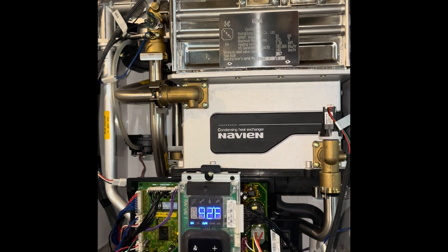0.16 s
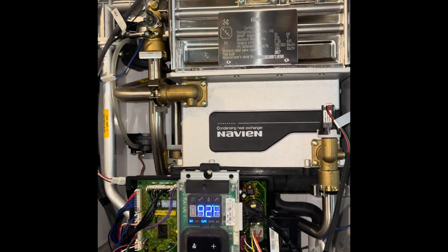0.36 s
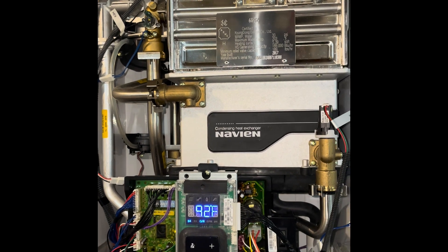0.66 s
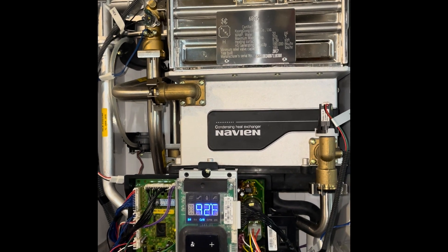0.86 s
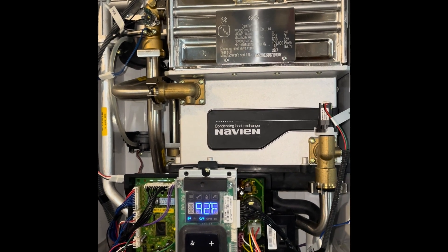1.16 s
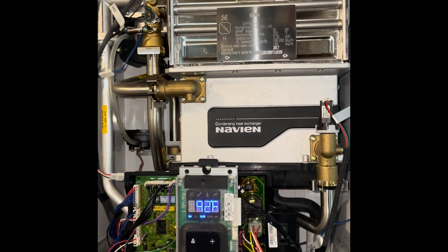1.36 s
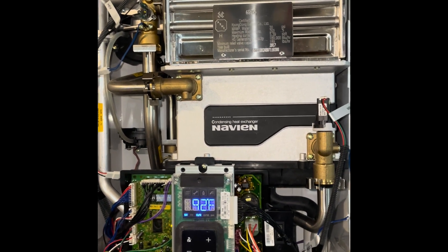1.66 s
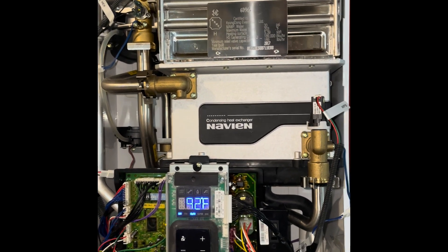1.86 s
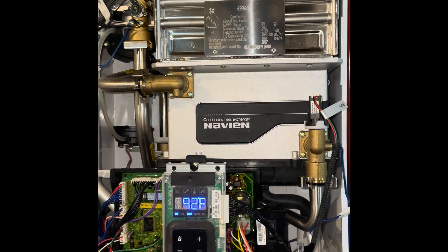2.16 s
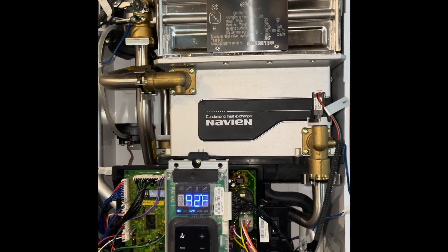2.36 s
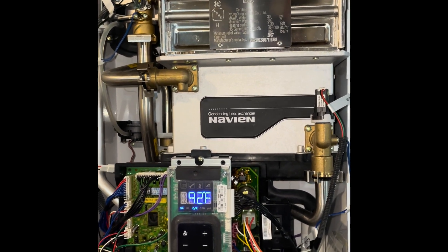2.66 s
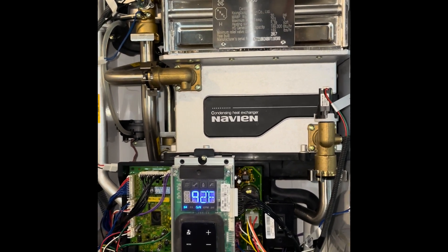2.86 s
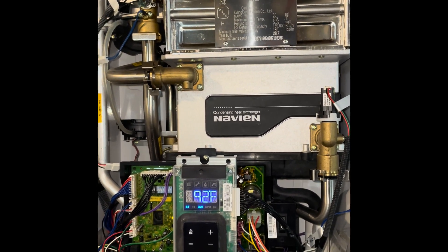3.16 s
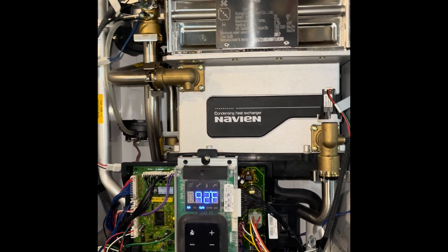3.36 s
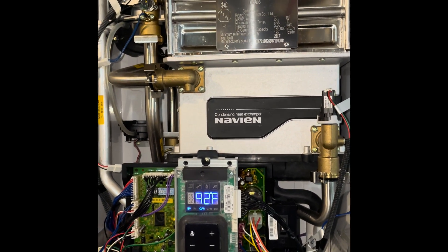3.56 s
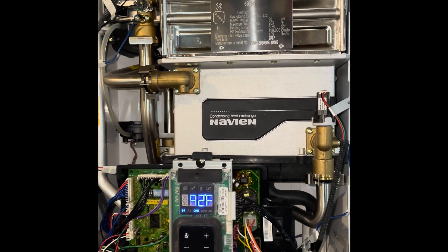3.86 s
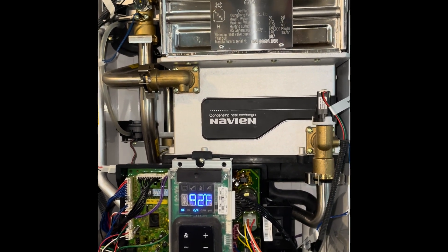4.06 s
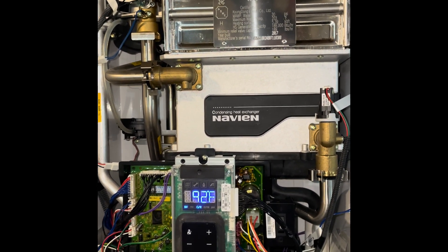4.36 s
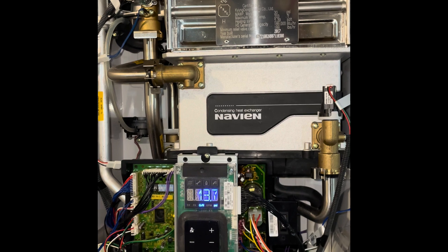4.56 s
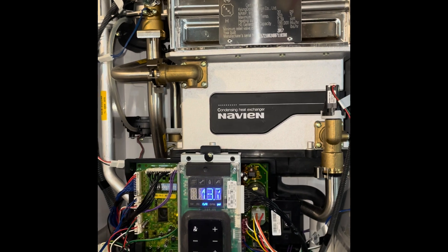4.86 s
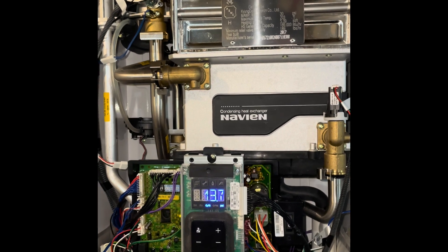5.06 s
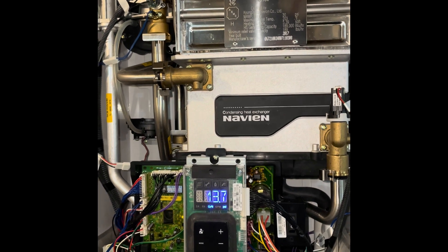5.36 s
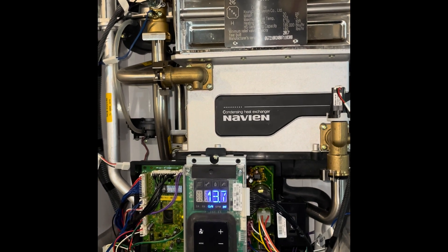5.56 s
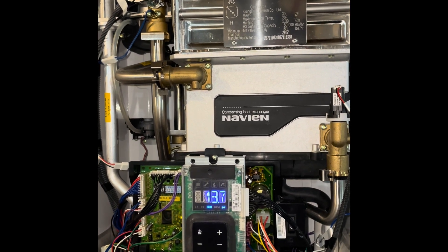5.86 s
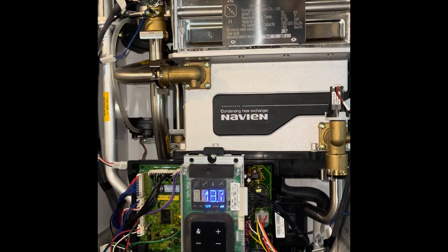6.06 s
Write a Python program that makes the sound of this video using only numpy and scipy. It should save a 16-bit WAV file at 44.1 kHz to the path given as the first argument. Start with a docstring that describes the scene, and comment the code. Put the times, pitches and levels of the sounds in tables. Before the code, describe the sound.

Steady close boiler blower drone with uneven low boom, airy roar and thin whine; at the very end relays click and the pitch begins sagging.

```python
"""Gas boiler blower coasting down

A boiler with its cover off, heard close by: the blower runs at full speed, loses power and coasts.
Shaft, blades and motor whine as sines at multiples of the shaft rate. Filtered noise makes the low boom,
the air rush, the rings of ducts and sheet-metal casing, a thin fluttering whistle and relay clicks.
The stereo channels differ in phase and likeness, mostly in the treble."""
import sys
import numpy as np
from scipy import signal
from scipy.fft import rfft, irfft
from scipy.io import wavfile
from scipy.ndimage import uniform_filter1d

SR = 44100
rng = np.random.default_rng(int(sys.argv[2]) if len(sys.argv) > 2 else 0)


def ratio(d):
    """dB to gain"""
    e = np.asarray(d, float) / 20
    return 10 ** e


def master_out(mix):
    """Clip the mix to full scale and print it as 16-bit PCM to the path in sys.argv[1]."""
    frames = np.transpose(np.atleast_2d(mix))
    ceiling = np.clip(frames, -1, 1)
    pcm = np.round(ceiling * 32767).astype(np.int16)
    wavfile.write(sys.argv[1], SR, pcm)


N = 273861
TIME_S = np.arange(N) / SR
BIN_HZ = np.maximum(np.arange(N // 2 + 1) * SR / N, 1)

# blower speed with power on: time_s, shaft_rate_hz
POWERED_SPEED = [(0, 96.6), (1.0, 97.0), (2.4, 96.95), (3.3, 96.6), (5.8, 96.8)]
# rotor tones, multiples of the shaft rate: imbalance, 13 blades, higher tones
ROTOR_MULTIPLES = [1, 13, 26, 27, 39]
# rotor tones before power-off: level_db, waver_db
ROTOR_LEVELS = [(-46, 1.8), (-47.5, .8), (-52, 3), (-63, 2.5), (-69, 2.5)]
# tones of the motor's magnetic pull, multiples of the shaft rate
MOTOR_MULTIPLES = [32, 40, 48, 55, 56, 80]
# motor tones with the drive on: level_db, waver_db
MOTOR_LEVELS = [(-67, 2.5), (-57.5, 2.2), (-73, 2.5), (-65.5, 2.5), (-64, 3), (-64.5, 2.5)]
# uneven level of the low boom: time_s, level_db
BOOM_LEVEL = [(0.0, -36), (0.03, -31), (0.47, -26.5), (0.5, -32.5), (1.47, -29), (1.55, -36), (1.66, -28),
              (2.07, -30), (2.13, -40), (2.28, -30), (2.61, -32), (2.72, -25.5), (2.77, -38), (2.92, -26),
              (2.97, -36), (3.25, -25.5), (3.53, -33.5), (3.58, -26), (3.89, -30.5), (5.53, -31.5),
              (5.55, -25.5), (5.78, -30.5), (6.12, -30.5), (6.21, -39.5)]
# resonances of the main duct: center_hz, width_hz, relative_level_db
BOOM_RESONANCES = [(209, 22.8, 3.5), (238.4, 10.9, -5)]
# broad rush of air at starting speed: frequency_hz, density_db_per_hz
RUSH_SPECTRUM = [(20, -100), (36, -97), (50, -73.5), (130, -64), (350, -68), (620, -74), (1400, -77.5),
                 (2100, -79.5), (3000, -80.5), (3600, -86), (4600, -88.5), (7000, -89), (8300, -89.5),
                 (11500, -91.5), (11900, -94.5), (12600, -98), (12950, -104), (13200, -100), (15700, -101)]
# air resonances of ducts and burner box at starting speed: center_hz, width_hz, level_db
DUCT_RESONANCES = [(57.4, 19, -50), (154.3, 9.8, -48.5), (175.3, 6.2, -39.5), (287.8, 23.8, -41),
                   (323, 14, -47.5), (409.6, 23, -47), (434, 28, -53.5), (485, 48, -41), (549.6, 26, -46),
                   (630, 42, -66), (789.6, 72, -47), (878, 55, -53.5), (995, 53, -50.5),
                   (1062.4, 35, -46.5), (1189, 76, -56.5), (1331, 120, -55.5), (1458, 36, -51.5),
                   (1642, 113, -51), (1748, 33, -49.5), (1809, 67, -45), (1946, 93, -57),
                   (2260, 130, -58.5), (2492, 59, -46.5), (2664, 69, -57.5), (2790, 36, -53)]
# rings of the sheet-metal casing at starting speed: center_hz, width_hz, level_db
CASING_RINGS = [(3210, 60, -59.5), (3335, 130, -57.5), (3768, 66, -64), (4370, 75, -65), (4900, 100, -60),
                (5560, 120, -61.5), (5830, 120, -60), (6130, 180, -59), (6470, 70, -57.5), (6760, 190, -57),
                (7250, 150, -61), (7400, 60, -70), (7610, 80, -64), (8000, 200, -63)]
# whistle bursts: start_s, length_s, level_db
BURSTS = [(.23, .05, -68), (.54, .04, -65), (.9, .33, -64), (1.8, .05, -67), (2.27, .06, -65),
          (2.53, .06, -67), (2.81, .03, -66), (3.245, .03, -65), (3.35, .04, -63), (3.53, .14, -67),
          (3.9, .47, -65), (4.53, .05, -67), (5.23, .21, -68), (5.79, .06, -66)]
# relay contacts: start_s, starting_level_db, ring_hz, width_hz, t60_s
RELAY_CLICKS = [(5.894, -43, 4000, 3000, .04), (5.9185, -37, 6500, 7000, .05), (5.98, -39, 7500, 6000, .05)]
# stereo phase, likeness and balance by frequency:
# frequency_hz, right_phase_lag_rad, likeness_0_to_1, left_minus_right_db
STEREO = [(40, 0, 1, 0), (90, 0, 1, -.4), (200, .02, .999, -1), (340, .05, .985, -1),
          (500, .15, .985, -1.2), (660, .1, .86, -2.5), (1050, .05, .96, -2), (1350, .03, .97, -1.5),
          (1800, .03, 1, -.2), (2100, .55, .9, 0), (2750, .65, .93, 0), (3050, .7, .5, -1.5),
          (4600, 1.0, .76, -1), (4800, 0, .96, 0), (5250, .05, .92, 0), (6850, 2.5, .93, 0),
          (7000, 3.0, .98, 0), (7500, np.pi, .995, 0), (8200, 3.2, .99, 0), (8700, 3.9, .8, 0),
          (10300, 5.5, .82, 0), (10400, 2 * np.pi, 1, 0), (11400, 2 * np.pi, 1, 0), (12000, 7.2, .65, 0),
          (12800, 8.7, .5, 0), (13200, 9.2, .9, 0), (13700, 3 * np.pi, 1, 0), (15050, 3 * np.pi, 1, 0),
          (15200, 9.7, .75, 0), (15700, 10.2, .5, 0)]

POWER_OFF_S, COAST_TIME_CONSTANT_S = 5.825, 2.9
# blade load: quick drop, then a slope
UNLOAD_DB, UNLOAD_TIME_CONSTANT_S, UNLOAD_SLOPE_DB_PER_S = -7, .03, -19
# collapse of the motor field
DRIVE_OFF_S, DRIVE_OFF_DB, DRIVE_FADE_TIME_CONSTANT_S = 5.92, -20, .02
SWELL_WINDOW_S = .15
WHISTLE_HZ, WHISTLE_WIDTH_HZ = 11590, 120
WHISTLE_REST_DB, WHISTLE_EDGE_S = -71, .02  # between bursts; rise and fall


def curve(table):
    """Interpolate columns of a time table at every sample."""
    time_s, *columns = np.transpose(table)
    return [np.interp(TIME_S, time_s, column) for column in columns]


def by_hz(table):
    """Interpolate columns of a frequency table at every bin, over log frequency."""
    hz, *columns = np.transpose(table)
    return [np.interp(np.log(BIN_HZ), np.log(hz), column) for column in columns]


def unit(x):
    """Scale to rms 1."""
    return x / np.sqrt(np.mean(x ** 2))


def walk(rate_hz):
    """Random levels held 1 / rate_hz and slewed twice; rms 1."""
    hold = int(SR / rate_hz)
    steps = np.repeat(rng.standard_normal(N // hold + 1), hold)
    slewed = uniform_filter1d(uniform_filter1d(steps, hold), hold)
    return unit(slewed[:N])


def ring(hz, width_hz):
    """Two unrelated noises through one resonance, band-passed twice; rms 1."""
    b, a = signal.iirpeak(hz, hz / (1.36 * width_hz), SR)
    once = signal.lfilter(b, a, rng.standard_normal((2, N)))
    return unit(signal.lfilter(b, a, once))


def blower():
    """Shaft rate, blade load and motor drive: steady, then exponential coasting after power-off."""
    coast_s = np.maximum(TIME_S - POWER_OFF_S, 0)
    shaft_hz = curve(POWERED_SPEED)[0] * np.exp(-coast_s / COAST_TIME_CONSTANT_S)
    quick_drop_db = UNLOAD_DB * (1 - np.exp(-coast_s / UNLOAD_TIME_CONSTANT_S))
    load_db = quick_drop_db + UNLOAD_SLOPE_DB_PER_S * coast_s
    drive_off_s = np.maximum(TIME_S - DRIVE_OFF_S, 0)
    drive_db = DRIVE_OFF_DB * (1 - np.exp(-drive_off_s / DRIVE_FADE_TIME_CONSTANT_S))
    return shaft_hz, load_db, drive_db


def tones(multiples, levels, turns):
    """Sines locked to the shaft, each wavering in level."""
    out = []
    for multiple, (level_db, waver_db) in zip(multiples, levels):
        gain = ratio(level_db + waver_db * walk(9)) * np.sqrt(2)
        out.append(gain * np.sin(2 * np.pi * (multiple * turns + rng.random())))
    return out


def rotor(turns, load_db):
    """Unloading drops the blade tone most, the higher rotor tones less; the shaft shakes more."""
    shaft, blades, *higher = tones(ROTOR_MULTIPLES, ROTOR_LEVELS, turns)
    return ratio(-.35 * load_db) * shaft + ratio(load_db) * blades + ratio(.3 * load_db) * sum(higher)


def motor(turns, drive_db):
    """Whine of the magnetic pull, fading with the drive."""
    return ratio(drive_db) * sum(tones(MOTOR_MULTIPLES, MOTOR_LEVELS, turns))


def boom():
    """Turbulence rings the main duct; swells and dips follow the table, finer throb is random."""
    raw = sum(ratio(db) * ring(hz, width_hz) for hz, width_hz, db in BOOM_RESONANCES)
    swell = np.sqrt(uniform_filter1d(raw ** 2, int(SWELL_WINDOW_S * SR)))
    return raw / swell * ratio(curve(BOOM_LEVEL)[0])


def rush():
    """Broadband turbulence: white noise shaped to a spectrum."""
    spectrum = rfft(rng.standard_normal((2, N)))
    return irfft(spectrum * ratio(by_hz(RUSH_SPECTRUM)[0]) * np.sqrt(SR / 2), N)


def ducts():
    """Air resonances driven by turbulence, each flickering alone."""
    return sum(ratio(db + 1.25 * walk(6)) * ring(hz, width_hz) for hz, width_hz, db in DUCT_RESONANCES)


def casing():
    """Sheet-metal resonances driven by turbulence, each flickering alone."""
    return sum(ratio(db + 1.2 * walk(8)) * ring(hz, width_hz) for hz, width_hz, db in CASING_RINGS)


def air(shaft_hz):
    """Rush and the resonances it drives; all fall steeply with fan speed."""
    flow_db = 55 * np.log10(shaft_hz / shaft_hz[0])
    return ratio(flow_db) * (rush() + ducts() + casing())


def whistle():
    """Narrow hiss from a gap, fluttering up in bursts; the faint rest level ends at drive-off."""
    gain = ratio(WHISTLE_REST_DB) * (TIME_S < DRIVE_OFF_S)
    for start_s, length_s, level_db in BURSTS:
        to_edge_s = np.minimum(TIME_S - start_s, start_s + length_s - TIME_S)
        gain = gain + ratio(level_db) * np.clip(to_edge_s / WHISTLE_EDGE_S + .5, 0, 1)
    flutter = ratio(4.1 * walk(45))
    return gain * flutter * ring(WHISTLE_HZ, WHISTLE_WIDTH_HZ)


def relays():
    """Each contact: a short rattle of resonant noise that dies away fast."""
    out = np.zeros(N)
    for start_s, level_db, hz, width_hz, t60_s in RELAY_CLICKS:
        age_s = TIME_S - start_s
        decay = ratio(level_db - 60 * np.maximum(age_s, 0) / t60_s)
        out += decay * (age_s > 0) * ring(hz, width_hz)[0]
    return out


def stereo(shared, apart):
    """Right channel: shared sound turned in phase by frequency, mixed with some the left lacks."""
    lag_rad, likeness, balance_db = by_hz(STEREO)
    likeness = np.clip(likeness, 0, 1)
    left = rfft(shared)
    right = likeness * left + np.sqrt(1 - likeness ** 2) * rfft(apart)
    right = right * np.exp(-1j * lag_rad)
    return irfft(np.array([left * ratio(balance_db / 2), right * ratio(-balance_db / 2)]), N)


def scene():
    """Blower tones, air noise and relays in stereo."""
    shaft_hz, load_db, drive_db = blower()
    # speed hunts a little
    turns = np.cumsum(shaft_hz * (1 + .0016 * walk(18))) / SR
    whine = rotor(turns, load_db) + motor(turns, drive_db)
    noise = boom() + air(shaft_hz) + whistle()
    return stereo(noise[0] + whine + relays(), noise[1])


def top_cut(x):
    """Nothing passes above the cut-off."""
    return signal.sosfilt(signal.butter(12, 15720, fs=SR, output="sos"), x)


def record(dry):
    """Output of the finished mix."""
    return top_cut(dry)


dry = scene()
out = record(dry)
master_out(out)
```